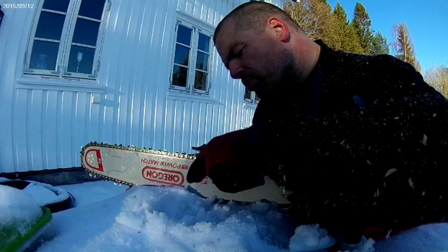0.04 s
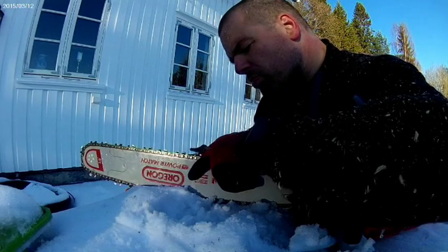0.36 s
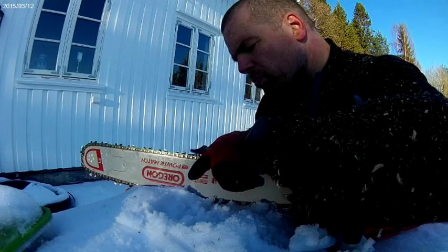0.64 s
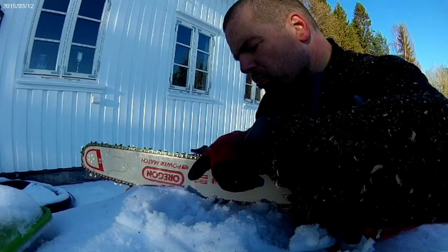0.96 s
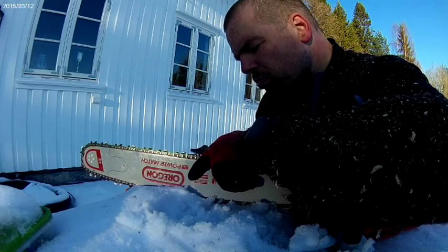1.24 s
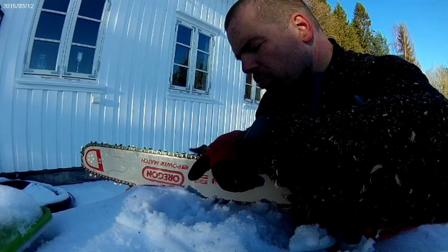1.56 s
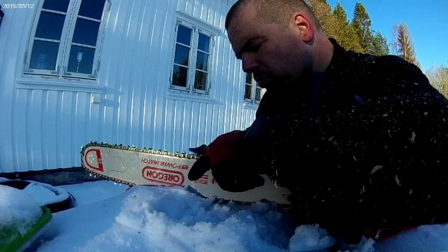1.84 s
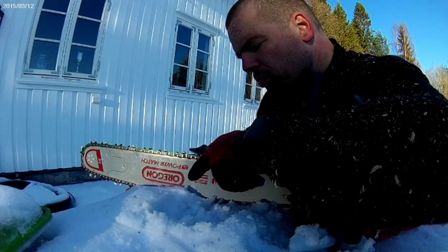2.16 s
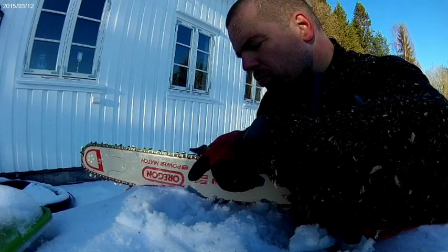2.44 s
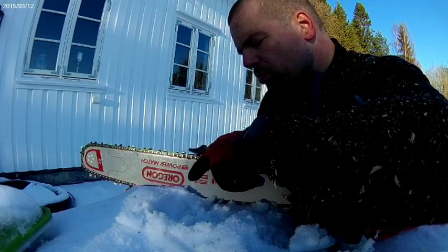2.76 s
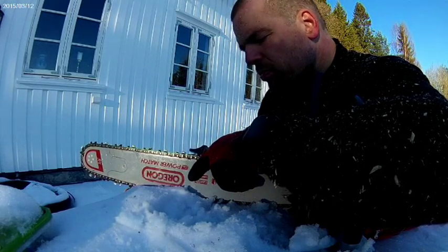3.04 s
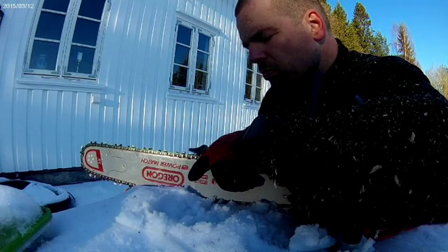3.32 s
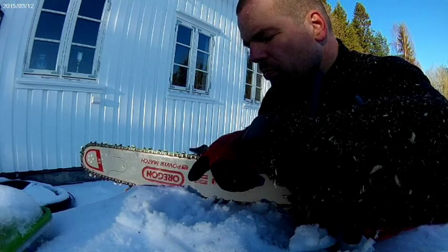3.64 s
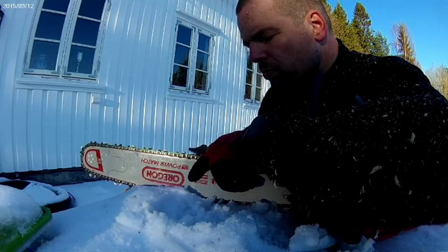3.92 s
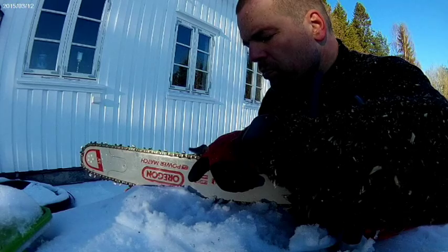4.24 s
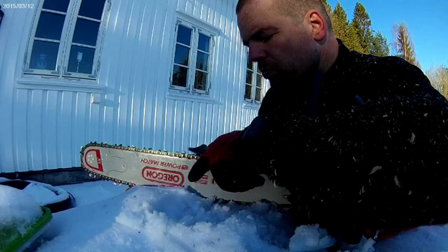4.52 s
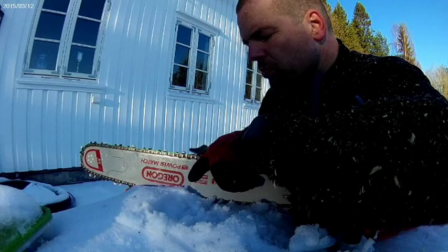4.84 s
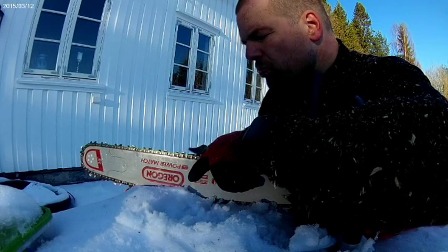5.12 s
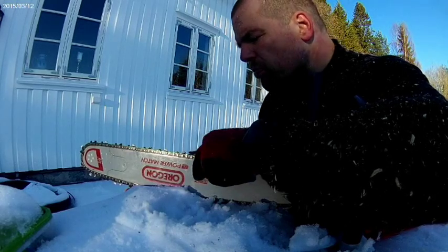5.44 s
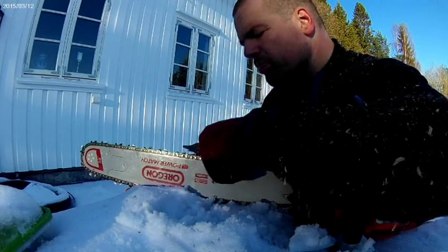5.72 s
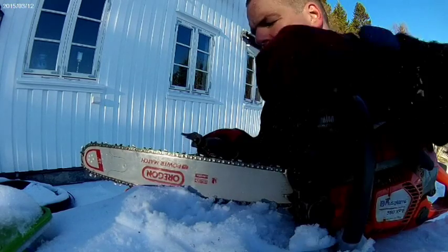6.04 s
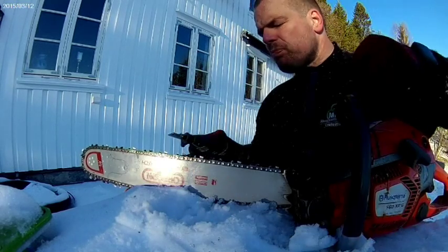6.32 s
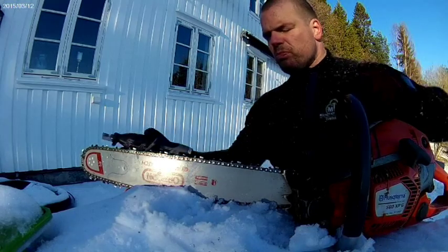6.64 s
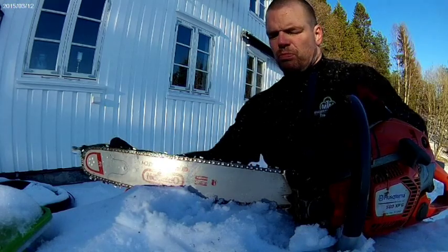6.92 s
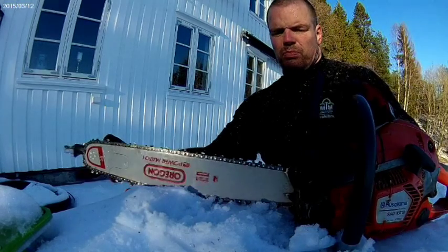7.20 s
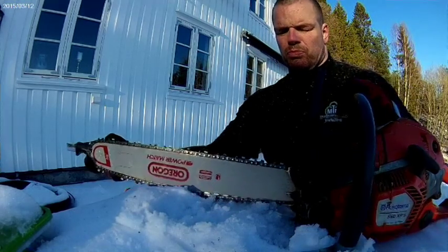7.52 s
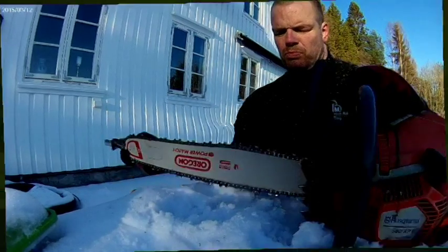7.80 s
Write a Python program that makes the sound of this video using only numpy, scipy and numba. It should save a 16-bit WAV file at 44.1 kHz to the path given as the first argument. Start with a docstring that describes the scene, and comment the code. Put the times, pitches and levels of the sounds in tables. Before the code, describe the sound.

A small rotary tool whines and grinds a saw chain in strokes, then spins freely as the saw is dragged and knocks on snow.

```python
"""In a quiet, snowy yard, a small rotary tool sharpens a saw chain. Its motor whines freely and its fan
blows. Then its stone is pressed on a tooth in strokes: the motor slows, the stone shakes the saw's bar
and tooth once a turn, and its grit hisses. Lifted off, the tool speeds up again. The saw is then dragged
round on the snow, scraping and knocking. A house wall gives a faint echo of the grinding and dragging."""
import sys
import numpy as np
from scipy import signal
from scipy.fft import rfft, irfft, next_fast_len
from scipy.io import wavfile
from numba import njit

SR = 44100
rng = np.random.default_rng(int(sys.argv[2]) if len(sys.argv) > 2 else 0)


def output_pcm(signal):
    """Save a mono or channel-first signal as 16-bit PCM at the path in sys.argv[1].

    Samples are clipped to [-1, 1] before scaling.
    """
    pcm = np.clip(np.atleast_2d(signal).T, -1, 1) * 32767
    wavfile.write(sys.argv[1], SR, np.round(pcm).astype(np.int16))


N = 351036
T = np.arange(N) / SR

CUT_START_S, CUT_END_S = .429, 4.997
FREE_HZ, PULL_HZ_PER_S = 245.3, 289  # turns a second with no load; strength of the pull back to that speed
# An "order" is a tone at a whole multiple of the shaft's speed.
COMMUTATOR_ORDER = 12  # made by the motor's spinning electrical contacts
LOUD_ORDERS = (1, 5, 6, 9, COMMUTATOR_ORDER)

# The hand's steady lean. Each row: time in seconds, braking in Hz a second, bar, tooth and grit in dB.
LEAN = [(0.44, 1.2, -44, -44.5, -47.5), (0.6, 43.4, -41, -38.5, -43), (0.95, 98, -38.5, -38, -47),
        (1.3, 164, -40.5, -42.5, -47), (1.85, 187, -39.5, -40, -48), (2.35, 242, -40, -41, -44.5),
        (2.9, 294, -37.5, -38.5, -45), (3.1, 314, -37.5, -40.5, -44.5), (3.65, 414, -38, -37.5, -45),
        (4.2, 456, -37.5, -44, -48.5), (5.0, 402, -37.5, -41, -48)]
# Pushes on top of the lean. Each row: start and length in seconds, extra braking in Hz a second,
# then growl, edge ring, extra tooth ring and extra grit in dB.
STROKES = [(1.325, .14, 33, -39, -60, 4, 3), (1.459, .091, 129, -48, -35.5, 5, 16),
           (1.575, 0.11, 166, -53, -35, 1.5, 11), (2.049, 0.17, 121, -51, -38, -1, 7.5),
           (2.118, 0.045, 0, -55, -40, 7, 6.5), (2.419, 0.089, 103.5, -41, -44, 0, 1),
           (2.689, 0.078, 84, -39.5, -44, 1.5, 2), (2.846, 0.21, 64, -40.5, -67, 1.5, -0.5),
           (3.134, 0.17, 129, -38.5, -49, 2, -0.5), (3.334, 0.19, 97.5, -45.5, -67, -0.5, -1),
           (3.709, 0.105, 130, -41, -35, -3, 2), (3.964, 0.15, 105, -39, -36, -0.5, 4),
           (4.239, 0.15, 110, -40.5, -36, 2.5, 6.5), (4.51, 0.15, 117.5, -40.5, -38, 1.5, 5),
           (4.8, 0.089, 135, -42, -40, 2, 4), (4.911, 0.085, 0, -57, -39, 4, 7)]
# The stone snags on the edge. Each row: time in seconds, change of grit in dB, tick in dB.
SNAGS = [(.513, 9.5, -43), (1.514, -2, -26), (1.618, 4.5, -33), (2.089, 6, -40), (2.162, 3, -31),
         (4.0374, 11, -32), (4.37, -1, -38)]
# How unevenly the stone runs. Each row: time in seconds, amount of rasp compared with tone.
ROUGHNESS = [(.53, 1.3), (.62, .3), (1.3, .28), (1.52, .7), (2.18, .7), (2.3, .38), (4.88, .52), (5.0, 1.3)]
# The steel squeals. Each row: start and length in seconds, order, dB above the usual squeal.
SQUEALS = [(.595, .15, 5, 2), (.58, .17, 6, -4), (.93, .17, 7, -4), (1.42, .05, 5, 2), (1.57, .09, 5, -1),
           (1.755, .035, 7, 0), (2.3, .04, 7, 0), (2.835, .06, 11, 0), (3.07, .06, 8, -2),
           (3.59, .06, 8, 0)]
# The skimming stone zings. Each row: start and length in seconds, level in dB.
ZINGS = [(.865, .09, -48), (1.015, .064, -45)]
# Tone colours of the grinding. Each row: pitch in Hz, relative strength in dB.
BAR_COLOUR = [(145, -16), (350, -12.5), (590, -13), (690, -4), (950, 1), (1380, 4.5), (1600, -3),
              (1800, -11)]  # the long bar that carries the chain
TOOTH_COLOUR = [(1400, -35), (1700, -2), (1900, 6), (2400, 2.5), (2700, 2.5), (2950, -10.5), (3250, -6),
                (3550, -47), (4200, -15)]
GROWL_COLOUR = [(740, -23), (910, 3.5), (1050, 2.5), (1220, -27)]  # the bar during a push
EDGE_COLOUR = [(2000, -53), (2350, -15.5), (2560, 4.5), (2700, -14), (2900, -7), (3200, -27)]  # the cutting edge during a push
GRIT_COLOUR = [(2800, -19), (4200, 3.5), (4650, -2.5), (5200, 1), (7000, -0.5), (7400, 4.5), (8800, -4.5),
               (9900, -5.5), (10700, -2.5), (12400, -25)]
SKIM_COLOUR = [(1760, -41), (3000, -7), (3260, 0), (3870, -8), (4230, -1.5), (4800, -12), (7050, -8.5),
               (9160, -6.5), (10600, -9.5), (12400, -31)]
ZING_COLOUR = [(5600, -25), (6250, 1), (7000, -3), (8600, -7), (9400, 3), (10400, -3), (11800, -10),
               (12400, -20)]
CHATTER_COLOUR = [(2450, -4.5), (3100, -19.5), (3550, -8.5), (4200, 2.5), (5050, -8), (5550, -14),
                  (6900, -17), (8600, -15), (9750, -2), (10700, -13), (12400, -28)]  # the tooth when the stone bites
STEEL_COLOUR = [(4300, -19), (4850, 1), (5250, 3), (5700, -16)]  # bright rasp during a push

# The whine as the tool is turned about. Each row: time in seconds, base dB of each of the LOUD_ORDERS.
WHINE_LEVELS = [(0.3, -54.5, -49.5, -52, -58, -49), (0.8, -64, -63, -46, -46.5, -46.5),
                (1.05, -74, -77, -48, -50, -44.5), (1.38, -77, -55, -43.5, -59, -43),
                (1.62, -82, -53, -60, -50, -49), (5.08, -73, -53, -56, -64, -59),
                (5.32, -57, -66, -55, -50, -44.5), (5.62, -64, -61, -51.5, -60, -50.5),
                (6.1, -56, -65, -57, -64, -49.5), (6.62, -67, -50.5, -92, -46.5, -59.5),
                (7.34, -65, -50.5, -68, -44.5, -52)]
# Weaker motor tones. Each row: order, dB above the base level of the fan's hiss.
FAINT_ORDERS = [(7, -5.5), (11, -2), (15, -17)]
# The fan as the tool is turned about. Each row: time in seconds, base dB of rush, whistle and hiss.
FAN_LEVELS = [(0.2, -50, -47, -59), (5.1, -51.5, -49.5, -61.5), (5.87, -51, -51, -57.5),
              (6.31, -51, -46.5, -57), (6.64, -46.5, -49, -59), (7.35, -44.5, -42.5, -57)]
# Tone colours of the fan. Each row: pitch in Hz, relative strength in dB.
RUSH_COLOUR = [(350, -7.5), (600, -7), (830, 6.5), (1100, 1.5), (1800, -0.5)]
WHISTLE_COLOUR = [(1600, -16), (2000, -12.5), (2480, 3.5), (2900, -4.5), (3200, -12.5), (3500, -18)]
HISS_COLOUR = [(3200, -1), (3700, -1.5), (4350, 5.5), (4900, -0.5), (7000, -4), (8200, -0.5),
               (11500, -10.5), (12400, -26)]

# Shoves of the saw. Each row: start, hardest moment and stop in seconds, rumble and crunch in dB.
SHOVES = [(7.37, 7.59, 7.625, -35, -41), (7.625, 7.78, 7.85, -27, -34.5), (7.90, 7.95, 7.97, -38, -49)]
# Knocks of the saw. Each row: time in seconds, body thud in dB, chain rattle in dB.
KNOCKS = [(7.607, -31, -31), (7.640, -30, -45), (7.671, -27, -33), (7.722, -30, -33), (7.757, -17.5, -38),
          (7.765, -20, -34), (7.783, -21.5, -24.5), (7.799, -26, -42), (7.832, -30, -38)]
# Tone colours of the hollow saw, snow and chain, and yard. Each row: pitch in Hz, relative strength in dB.
SAW_COLOUR = [(100, -7), (165, 3.5), (270, -2.5), (390, 3), (660, 3.5), (880, -5), (1400, -4), (2700, -5.5),
              (3300, -35)]
CRUNCH_COLOUR = [(900, -24), (1700, 11), (2700, 19), (3350, 10), (4400, 25), (5000, 15), (5600, 2),
                 (6700, 5.5), (7700, 9.5), (10500, 1), (12400, -17)]
YARD_COLOUR = [(20, -1), (70, 5), (140, 4.5), (450, -0.5), (800, -5), (2000, -67)]


def grinding(turns, hz, bar_db, tooth_db, grit_db, growl, edge, pushing):
    """The stone's high spot strikes once a turn, shaking bar and tooth and dragging grit over the steel."""
    rub = rubbing(turns, depth=.51, scatter_db=4)
    judder = rubbing(turns, depth=.65, scatter_db=2.6)
    rough, = curves(ROUGHNESS)
    beat = turns + .024 * rough * walk(45)  # the stone catches and slips, smearing the high tones

    def shaken(body, scrape, surge, below_order):
        """A shaken part both buzzes and rasps."""
        tone = buzz(beat, hz, body, surge, below_order)
        rasp = colour(scrape * noise(), body, ring_s=.002)
        return (tone + rough * rasp) / np.hypot(1, rough)

    ring = undb(bar_db) * shaken(BAR_COLOUR, rub, surge=.45, below_order=13)
    ring += growl * rub * buzz(beat, hz, GROWL_COLOUR, surge=.33, below_order=9)
    ring += undb(tooth_db) * shaken(TOOTH_COLOUR, judder, surge=.9, below_order=25)
    ring += edge * shaken(EDGE_COLOUR, judder, surge=.4, below_order=21)
    blows = strikes(turns, hz, jitter_s=4e-6, scatter_db=1.5)
    hiss = grit_hiss(hz, blows, rub, judder, grit_db, pushing)
    zing = colour(blows, ZING_COLOUR, ring_s=.004)
    zing *= sum(undb(db) * swell(start, length) for start, length, db in ZINGS)
    ticks = colour(noise(), CHATTER_COLOUR)
    ticks *= sum(undb(db) * (T > start) * fade(start, .0021) for start, _, db in SNAGS)
    first_blow = 1 + 3 * fade(CUT_START_S, .006)
    return contact() * first_blow * (ring + squeals(turns) + zing + ticks + hiss)


def buzz(turns, hz, body, surge, below_order):
    """The stone's beat makes a stack of tones. The shaken part favours some, and each surges on its own."""
    pitches, levels = np.transpose(body)
    out, power = 0, 1e-9
    for order in range(int(pitches[0] / FREE_HZ) + 1, below_order):
        if order == COMMUTATOR_ORDER:
            continue
        gain = undb(np.interp(order * hz, pitches, levels))
        angle = 2 * np.pi * (order * turns + .55 * rng.random())
        out += gain * ((1 + surge * walk(13)) * np.cos(angle) + surge / 2 * walk(13) * np.sin(angle))
        power += gain ** 2
    return out / np.sqrt(power * (1 + 1.25 * surge ** 2) / 2)


def grit_hiss(hz, blows, rub, judder, grit_db, pushing):
    """Grit scratches the tooth. A fast stone skims and sings; a hard-pressed one bites and chatters."""
    bite = 1 / (1 + undb(-2.5 * (grit_db + 40.5)))  # bite and skim are shares from 0 to 1
    skim = 1 / (1 + np.exp((205 - hz) / 6))
    scratch = rub * grains(per_s=4400, spread_db=4.5)
    grit = .5 * colour(scratch, GRIT_COLOUR, ring_s=.001) + .87 * colour(blows, GRIT_COLOUR, ring_s=.008)
    grit *= undb(1.7 * walk(60))
    singing = colour(blows + .59 * scratch, SKIM_COLOUR, ring_s=.006)
    chatter = colour(judder * grains(per_s=7400, spread_db=4.5), CHATTER_COLOUR, ring_s=.00125)
    steel = pushing * colour(blows + scratch, STEEL_COLOUR, ring_s=.002995) * undb(-3.5 + 2 * walk(15))
    sliding = np.sqrt(1 - skim) * grit + np.sqrt(skim) * singing + steel
    return undb(grit_db) * (np.sqrt(1 - bite) * sliding + np.sqrt(bite) * chatter)


def squeals(turns, usual_db=-37):
    """For a moment the steel locks on to one order of the shaft and squeals."""
    tones = sum(swell(start, length) * shaft_tone(turns, order, usual_db + db)
                for start, length, order, db in SQUEALS)
    return tones * undb(1.5 * walk(49.8))


def rubbing(turns, depth, scatter_db):
    """The stone bites hardest near its high spot, and harder on some turns than on others."""
    strength = np.clip(rng.standard_normal(4096), -2, 2)[np.round(turns).astype(int)]
    return unit(np.exp(depth * np.cos(2 * np.pi * turns)) * undb(scatter_db * strength))


def strikes(turns, hz, jitter_s=7e-6, scatter_db=3):
    """One sharp tap a turn, each a little early or late, strong or weak."""
    late, strength = rng.standard_normal((4096, 2))[np.round(turns).astype(int)].T
    samples_from_tap = ((turns - np.round(turns)) / hz + jitter_s * late) * SR
    taps = np.sinc(samples_from_tap * 2 / 3) * np.exp(-(samples_from_tap / 8) ** 2)
    return unit(taps * undb(scatter_db * strength))


def contact():
    """How firmly the stone touches the tooth, from 0 to 1."""
    return np.clip((T - CUT_START_S) / .003, 0, 1) * fade(CUT_END_S, .032)


def hand_pressure():
    """Leaning and pushing brake the shaft; together with the snags they set how loud the grinding is."""
    braking, bar_db, tooth_db, grit_db = curves(LEAN)
    growl = edge = pushing = 0
    for start, length, more_braking, growl_db, edge_db, more_tooth_db, more_grit_db in STROKES:
        push = swell(start, length, rise_s=.047, fall_s=.066)
        braking += more_braking * push
        tooth_db += more_tooth_db * push
        grit_db += more_grit_db * push
        growl += undb(growl_db) * push
        edge += undb(edge_db) * push
        pushing += push
    snag_db = sum(db * (T > start) * fade(start, .021) for start, db, _ in SNAGS)
    return braking, bar_db, tooth_db + .77 * snag_db, grit_db + snag_db, growl, edge, pushing


@njit
def shaft_speed(braking):
    """The stone brakes the shaft; the more it slows, the harder the motor pulls."""
    speeds, hz = np.empty(len(braking)), FREE_HZ
    for i in range(len(braking)):
        hz += (PULL_HZ_PER_S * ((FREE_HZ / hz) ** 2 - 1) - braking[i]) / SR
        speeds[i] = hz
    return speeds


def motor_whine(turns, hz, housing_hz=2510, width_hz=220, boost_db=6):
    """Shaft and commutator whine. The housing rings when one of the loud tones sweeps through its pitch."""
    tones = [(order, db + boost_db * np.exp(-((order * hz - housing_hz) / width_hz) ** 2))
             for order, db in zip(LOUD_ORDERS, curves(WHINE_LEVELS))]
    commutator_db = tones[-1][1]
    tones.append((2 * COMMUTATOR_ORDER, commutator_db - 27))
    _, _, hiss_db = curves(FAN_LEVELS)
    tones += [(round(order), hiss_db + db) for order, db in FAINT_ORDERS]
    waver_db = np.interp(hz, [190, 240], [2.2, 1])  # less steady when slowed
    return sum(shaft_tone(turns, order, db + waver_db * walk(22)) for order, db in tones)


def cooling_fan(turns, hz):
    """Air rushes, whistles and hisses, with a fine buzz from the motor's brushes in the hiss."""
    rush_db, whistle_db, hiss_db = curves(FAN_LEVELS)
    rush = undb(rush_db + 1.5) * colour(noise(), RUSH_COLOUR)
    whistle = undb(whistle_db - .5) * colour(noise(), WHISTLE_COLOUR)
    hiss = undb(hiss_db + 2) * colour(noise() + .5 * strikes(turns, hz), HISS_COLOUR, ring_s=.004)
    return rush + whistle + hiss


def saw_dragged(rise_db_per_s=32, fall_db_per_s=75):
    """Snow crunches and the hollow saw rumbles as each shove builds and slackens."""
    rumble = colour(grains(per_s=4400, spread_db=2.5), SAW_COLOUR, ring_s=.004)
    crunch = colour(grains(per_s=5800, spread_db=6), CRUNCH_COLOUR, ring_s=.00199)
    out = 0
    for start, hardest, stop, rumble_db, crunch_db in SHOVES:
        force = undb(np.minimum(rise_db_per_s * (T - hardest), fall_db_per_s * (hardest - T)))
        sliding = np.clip((T - start) / .035, 0, 1) * fade(stop, .012)
        out += force * sliding * (undb(rumble_db) * rumble + undb(crunch_db) * crunch)
    return out


def saw_knocks():
    """Each knock thuds in the saw's hollow body and rattles the chain."""
    thud, rattle = colour(noise(), SAW_COLOUR), colour(noise(), CRUNCH_COLOUR)
    out = 0
    for start, thud_db, rattle_db in KNOCKS:
        hit = np.clip((T - start) / .001, 0, 1) * fade(start, .007)
        out += hit * (undb(thud_db) * thud + undb(rattle_db) * rattle)
    return out


def yard():
    """The open yard: a soft, low rumble that wavers."""
    return undb(-51.5 + 1.5 * walk(9.6)) * colour(noise(), YARD_COLOUR)


def shaft_tone(turns, order, db):
    """A clean tone at a multiple of the shaft's speed."""
    return np.sqrt(2) * undb(db) * np.sin(2 * np.pi * (order * turns + rng.random()))


def colour(x, spectrum, ring_s=0.):
    """Give a sound a tone colour and level 1. Each pitch is held back by up to ring_s, so it rings."""
    size = next_fast_len(N + 8192)
    f = np.arange(size // 2 + 1) * SR / size
    hz, db = np.transpose(spectrum)
    gain = undb(np.interp(np.log(f + 1), np.log(hz), db))
    gain *= np.minimum(f / hz[0], 1) ** 2 * np.minimum(hz[-1] / (f + 1), 1) ** 4  # fade past both ends
    steps_hz = np.arange(0, SR / 2, 170)
    delay_s = ring_s * np.interp(f, steps_hz, rng.random(len(steps_hz)))
    phase = 2 * np.pi * np.cumsum(delay_s) * SR / size
    return unit(irfft(rfft(x, size) * gain * np.exp(-1j * phase), size)[:N])


def grains(per_s, spread_db):
    """Tiny random clicks of very unequal size."""
    size = undb(spread_db * np.minimum(rng.exponential(size=N), 4))
    return unit((rng.random(N) < per_s / SR) * size * noise())


def swell(start, length, rise_s=.022, fall_s=.035):
    """Rise to 1, hold, then let go."""
    return np.interp(T, [start, start + rise_s, start + length, start + length + fall_s], [0, 1, 1, 0])


def fade(start, fade_s):
    """Stay at 1 until the start, then die away."""
    return np.exp(-np.maximum(T - start, 0) / fade_s)


def walk(per_s):
    """A wobble around zero: random values joined by straight lines."""
    levels = rng.standard_normal(4096)
    return 1.2 * np.interp(T * per_s, np.arange(len(levels)), levels)


def curves(rows):
    """Turn each column after the time column into a curve."""
    times, *columns = np.transpose(rows)
    return [np.interp(T, times, column) for column in columns]


def noise():
    """White noise."""
    return rng.standard_normal(N)


def unit(x):
    """Scale to an average (rms) level of 1."""
    return x / np.sqrt(np.mean(x ** 2))


def undb(db):
    """Turn decibels into a multiplier."""
    return 10 ** (np.asarray(db) / 20)


def scene():
    """One shaft drives stone and whine, so both drop in pitch as the hand presses."""
    braking, *levels = hand_pressure()
    load = braking * contact()
    waver = (.0005 + .0014 * load / PULL_HZ_PER_S) * walk(30)  # the speed wavers more under load
    hz = shaft_speed(load) * (1 + waver)
    turns = np.cumsum(hz) / SR
    work = grinding(turns, hz, *levels) + saw_dragged() + saw_knocks()
    wall_echo = undb(-14.5) * np.interp(T - .021, T, work, left=0)
    return (work + wall_echo + yard() + motor_whine(turns, hz) + cooling_fan(turns, hz))[None]


def record(dry, top_hz=12500):
    """Round off the loudest peaks and cut the highest treble."""
    treble_cut = signal.ellip(8, .2, 70, top_hz, fs=SR, output="sos")
    return signal.sosfilt(treble_cut, np.tanh(2 * dry) / 2)


dry = scene()
out = record(dry)
output_pcm(out)
```